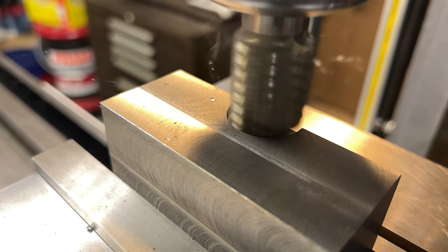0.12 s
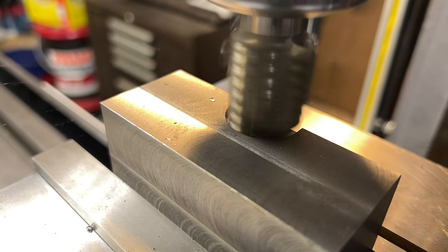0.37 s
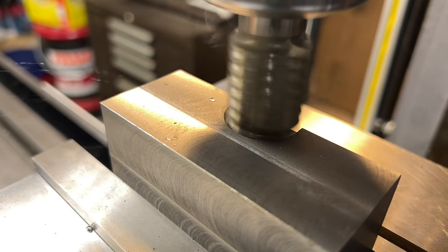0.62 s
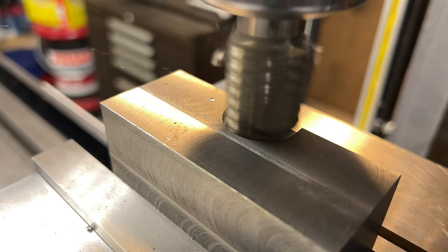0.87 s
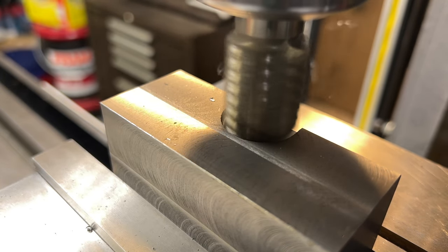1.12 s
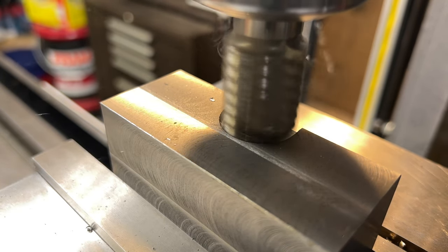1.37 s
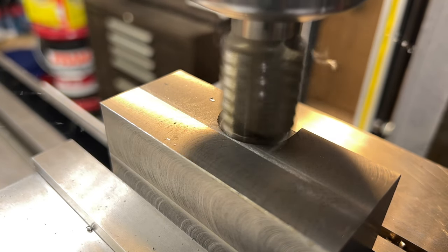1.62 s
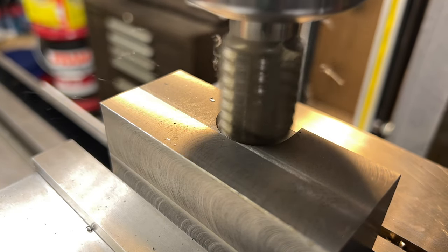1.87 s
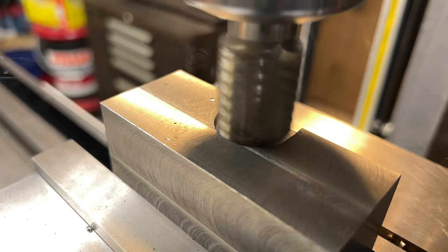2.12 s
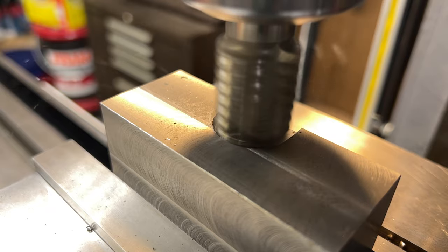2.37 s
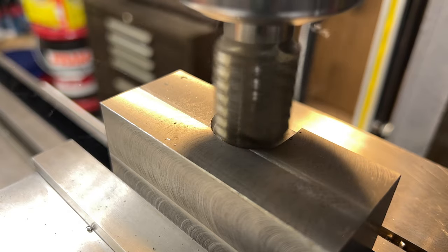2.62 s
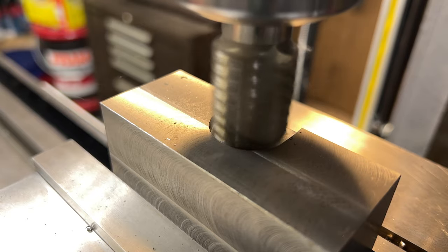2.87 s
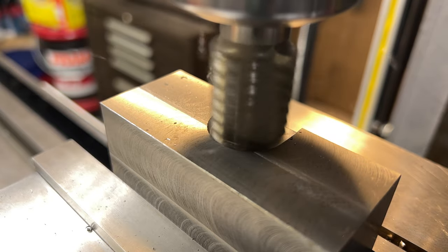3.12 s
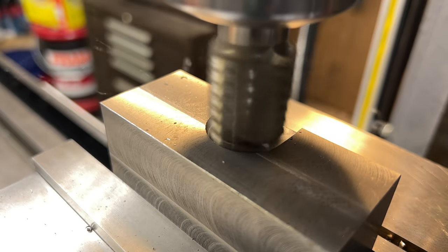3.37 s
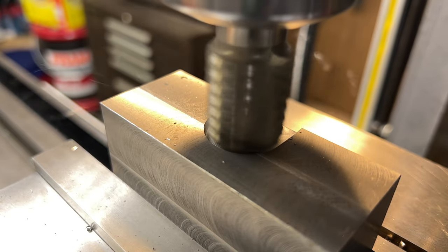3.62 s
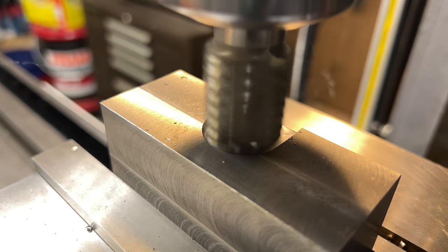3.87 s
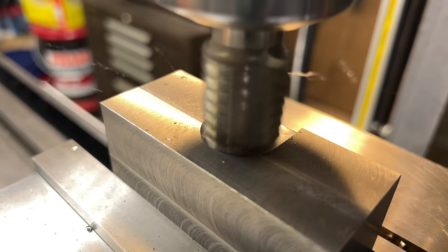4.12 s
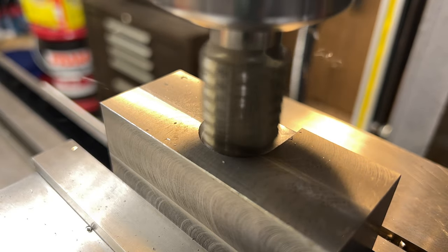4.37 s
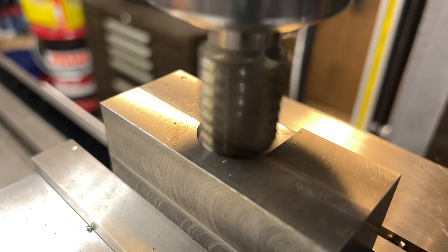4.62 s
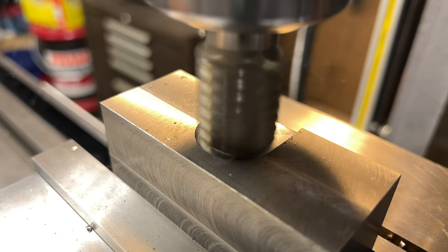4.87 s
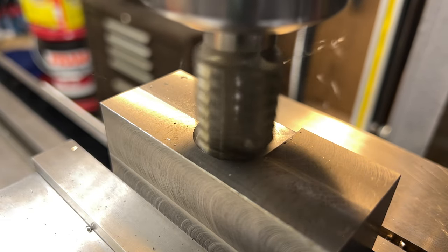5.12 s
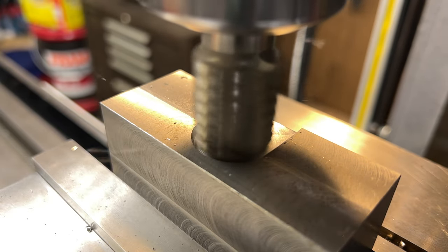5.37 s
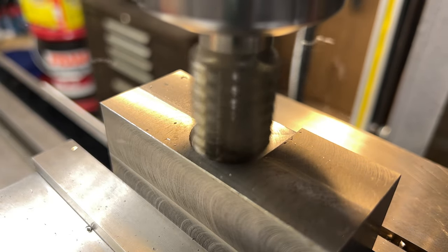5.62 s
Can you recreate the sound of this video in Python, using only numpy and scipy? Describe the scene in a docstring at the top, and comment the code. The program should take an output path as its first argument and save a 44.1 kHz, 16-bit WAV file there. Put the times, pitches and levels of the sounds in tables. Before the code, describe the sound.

A milling machine heard from very near, with little sense of room. Starting quiet, it swells to full level by about two seconds and continues without stopping. A hoarse mid-pitched chatter flutters rapidly, bright scraping bursts ring the block and vice, and motor hum, faint gear whine and drive rumble sit behind.

```python
"""Milling a steel block

A milling cutter feeds through a steel block in a workshop, heard from close by through two microphone ports.
Once a turn the edge bites: the head chatters near its mode, locked to the waves left on the turn before.
The chip scrapes in gritty bursts of shaped noise that ring block and vice.
Behind lie the drive's rumble (coloured noise), gear tones and motor hum (drifting sines).
The whole sound swells in at first, then holds while the chatter and gear tones sag a little.
"""
import sys
import numpy as np
from scipy import signal
from scipy.fft import irfft, next_fast_len
from scipy.io import wavfile
from scipy.ndimage import uniform_filter1d

SR = 44100
rng = np.random.default_rng(int(sys.argv[2]) if len(sys.argv) > 2 else 0)


def rack_gain(trim_db):
    """Turn a fader trim in dB into the linear factor to multiply a signal by."""
    fader = np.asarray(trim_db, float)
    return 10 ** (fader / 20)


def pcm_store(signal):
    """Save signal as 16-bit PCM."""
    levels = np.round(np.clip(np.atleast_2d(signal), -1, 1) * 32767)
    wavfile.write(sys.argv[1], SR, levels.astype(np.int16).T)


N = 253655
SIZE = next_fast_len(N)
HZ = np.maximum(np.arange(SIZE // 2 + 1) * SR / SIZE, 1)  # frequency grid, kept off zero for the logs
T = np.arange(N) / SR
SIDE = np.array([[1], [-1]])  # left, right port

# rotation of the cutter, and a moment at which a turn starts
TURN_HZ, TURN_START_S = 30.84, 0.005
# chatter: pitch that the old waves hold from turn to turn, the head's mode within a bite
LOCK_HZ, HEAD_HZ, HEAD_WIDTH_HZ = 673.09, 690, 55
# shaft out of true: rate, phase moment of its pull on the chatter, depth on the bites, moment of a hard bite
WOBBLE_HZ, WOBBLE_START_S, WOBBLE_BITE_DB, WOBBLE_HARD_S = 10.82, 0.091, 1.3, 0.026
# the edge leaves the cut: moment and length as shares of a turn
EXIT_SHARE, EXIT_LENGTH = 0.767, 0.057
# even swell of the whole sound: gain at the start (0-1), time to full level
SWELL_FROM, SWELL_S = 0.17, 2.17
# full levels: the chatter, and against it the scrape and the drive rumble
CHATTER_DB, SCRAPE_DB, RUMBLE_DB = -24, -8.5, -14.5
# sag of chatter and gear tones once the swell is over
SAG_DB_PER_S = 0.17
# slow throb of the machine: rate, moment of a crest, depth on chatter and gears, depth on drive rumble
THROB_HZ, THROB_CREST_S, THROB_CHATTER_DB, THROB_RUMBLE_DB = 1.18, 3.29, 0.5, -0.2

# chatter over one turn: share of the turn/0-1, relative level/dB
CHATTER_TURN = [(0, -18.5), (.12, -10), (.3, -11.5), (.45, -2), (.62, 0.5), (.72, 0.5), (.84, -2),
                (.93, -12), (1, -33)]
# chip thickening and breaking over one turn: share of the turn/0-1, tear/0-1
TEAR_TURN = [(0, 0), (.2, .35), (.36, .7), (.46, 1), (.53, .9), (.64, .2), (1, 0)]
# the hardest bites, before each layer weighs them: t/s, extra in the middle/dB, extra in the treble/dB
HARD_BITES = [(0.766, 5, 1), (1.901, 3, 4.5), (2.29, 7, 4.5), (2.387, 5, 3.5), (3.003, 4, 3),
              (3.457, 7.5, 5), (3.49, 2.5, 5.5), (3.749, 5, 3.5), (4.041, 6.5, 3.5), (4.3, 3, 4),
              (5.046, 3.5, 4.6), (5.208, 3, 4), (5.305, 0, 5)]
# modes of block and vice: f/Hz, width/Hz, level over the broad scrape/dB, swell with the tear/dB,
# knock as the edge leaves/dB
BLOCK_MODES = [(1025, 192, 5, -4, 10), (1349, 54, 8.5, 12, -7), (1482, 51, 9.5, 13.5, 0),
               (2033, 17, -3.5, -19.5, 15), (2258, 86, 8, 13.5, 3), (2678, 114, 4.5, 8.5, -11),
               (2938, 97, 8.5, 7, -4), (3686, 124, -0.5, 17, -17), (4404, 170, 3.5, 7, 5),
               (5920, 365, 10.5, 10.5, 9), (6686, 130, 6.5, 21.5, -14), (7240, 340, 1, 15.5, -9),
               (8140, 370, 1, 13, -1)]
# spectrum of the broad scrape: f/Hz, relative level per Hz/dB
SCRAPE_SPECTRUM = [(300, -17.5), (600, -1), (1000, -3.5), (1800, -5), (3200, -4.5), (4900, -11),
                   (7000, -9.5), (9000, -13.5), (10700, -21), (11700, -28.5), (13100, -35), (14100, -20),
                   (14800, -39), (15700, -44)]
# spectrum of the drive rumble: f/Hz, relative level per Hz/dB
RUMBLE_SPECTRUM = [(14, -60), (24, -19), (91, -20), (135, -10.5), (188, -12), (264, -1.5), (327, -5.5),
                   (406, -11.5), (477, -9), (553, -9), (600, -1.5), (780, -22), (1320, -120)]
# modes of the drive casing: f/Hz, width/Hz, level over the rumble/dB
CASING_MODES = [(117, 4.9, 9), (269.6, 15, 8), (313, 11, 4.5), (323.2, 7.1, 7.5), (460, 4.8, 1.5),
                (495.5, 25, 7)]
# gear mesh tones: f/Hz
GEAR_HZ = 796.44, 1366.2, 2039
# the same tones: level against the chatter/dB, waver/dB, left minus right/dB
GEAR_LEVELS = [(-26, 2, -16), (-28, 0.5, -10), (-30.5, 1, 2)]
# motor hum lines: f/Hz
MOTOR_HZ = 150.6, 241.5
# the same lines: level against the chatter/dB, throb depth/dB, random waver/dB
MOTOR_LEVELS = [(-31, 4.5, 1.5), (-25.5, 3, 1.5)]
# how noise differs at the two ports: f/Hz, lead of the left/rad, share heard differently/0-1
PORTS = [(40, 0, .26), (150, 0, .2), (340, .55, .3), (600, -.4, .4), (1400, .1, .33), (2000, 0, .14),
         (2500, 0, .05), (7500, 0, .02), (8300, -.3, .2), (8900, .3, .05), (10500, 3.14, .05),
         (12000, 6.2, .03), (13900, 9.42, .05), (15300, 12.5, .1)]


def chatter(turn, share, extra_db):
    """Each bite rings at the head's mode with a size that the cut limits; only its phase is free to wander."""
    turns = turn.max() + 1
    since_middle_s = (share - 0.5) / TURN_HZ
    phase = 2 * np.pi * (LOCK_HZ * (T - since_middle_s) + HEAD_HZ * since_middle_s)

    # the waves of the last turn hold the phase; the shaft out of true and the tearing chip pull it away,
    # more and more as the bite goes on
    wobble = 0.5 * np.exp(-2j * np.pi * WOBBLE_HZ * (T - WOBBLE_START_S))
    shared_tear, own_tear = [walk(50) + 1j * walk(50) for _ in range(2)]
    tearing = 0.58 * shared_tear + 0.24 * SIDE * own_tear  # the ports face different sides of the head
    pull = 1 + (0.2 + 1.17 * share) * (wobble + tearing)
    pull = pull / np.sqrt(abs(pull) ** 2 + 0.052)  # size held almost even, phase kept

    # a chip that tears hard damps the ring
    bite_db = 0.11 * rng.standard_normal(turns)[turn] - 0.33 * extra_db[1]
    # some bites ring short and strong, others long and weak
    sharpness = np.exp(0.056 * rng.standard_normal(turns)[turn])
    bite_db += 4.3 * (sharpness - 1)
    shape_db = np.interp(share, *np.transpose(CHATTER_TURN))
    size = uniform_filter1d(rack_gain(sharpness * shape_db + bite_db), size=60)

    # the right port is louder and leads
    ring = rack_gain(-1.2 * SIDE) * np.real(size * pull * np.exp(1j * (phase - 0.33 * SIDE)))
    # the steady shake of the drive hisses faintly in a neighbouring mode
    shake = (size + 0.32) * ports(abs(hump(747, HEAD_WIDTH_HZ)) ** 2)
    return level(level(ring, 0) + level(shake, -13), 0)


def scrape(turn, share, extra_db):
    """The chip tears in a swelling, gritty burst each turn; each mode of block and vice answers in its measure."""
    turns = turn.max() + 1
    tear = np.interp(share, *np.transpose(TEAR_TURN))
    leave = np.exp(-((share - EXIT_SHARE) / EXIT_LENGTH) ** 2)

    # a hard bite lifts the burst, not the gaps; middle and treble have their own grit
    burst = tear ** 0.53
    mid_db = burst * extra_db[0] + 1.2 * walk(300)
    top_db = burst * extra_db[1] + 1.1 * walk(300)

    broad = rack_gain(along(SCRAPE_SPECTRUM))
    treble = 1 / (1 + (5000 / HZ) ** 8)  # power share above the 5 kHz crossover
    out = rack_gain(2.85 * tear + 0.47 * mid_db) * ports(broad * np.sqrt(1 - treble))
    out += rack_gain(7.3 * (tear - 0.5) + 1.1 * leave + top_db) * ports(broad * np.sqrt(treble))

    for hz, width_hz, db, swell_db, knock_db in BLOCK_MODES:
        chance_db = tear * rng.standard_normal(turns)[turn]
        gate_db = db + swell_db * (tear - 0.5) + knock_db * leave + chance_db
        # the modes that swell most with the tear also feel a hard bite most
        gate_db += swell_db / 12.4 * (top_db if hz > 5000 else mid_db)
        out += rack_gain(gate_db) * ringing(hz, width_hz, broad)
    return level(out, 0)


def gears():
    """Steady mesh tones, sines of drifting phase that waver in level."""
    tones = 0
    for hz, (db, waver_db, pan_db) in zip(GEAR_HZ, GEAR_LEVELS):
        tones = tones + tone(hz, db + waver_db * walk(3.14) + SIDE * pan_db / 2)
    return tones


def drive(share):
    """Motor and belt rumble, noise coloured by the casing's modes and nudged a little by each bite."""
    nudge_db = np.cos(2 * np.pi * (share - 0.7))
    level_db = nudge_db + 0.43 * walk(5.6) + 0.65 * SIDE  # the left port is louder
    rumble = ports(rack_gain(along(RUMBLE_SPECTRUM)) * resonances(CASING_MODES))
    return level(rack_gain(level_db) * rumble, 0)


def motor(throb):
    """Hum lines that come and go with the throb, the same at both ports."""
    lines = 0
    for hz, (db, throb_db, waver_db) in zip(MOTOR_HZ, MOTOR_LEVELS):
        lines = lines + tone(hz, db + throb_db * throb + waver_db * walk(4.0))
    return lines


def hardness(count):
    """Extra dB of every bite, middle and treble: the wobble and chance, but for the hardest ones."""
    bite_s = TURN_START_S + (np.arange(count)[:, None] + 0.46) / TURN_HZ
    extra_db = WOBBLE_BITE_DB * np.cos(2 * np.pi * WOBBLE_HZ * (bite_s - WOBBLE_HARD_S)) - 0.4
    extra_db = extra_db + 0.75 * rng.standard_normal((count, 1))  # chance common to both bands
    extra_db = extra_db + 0.26 * rng.standard_normal((count, 2))  # chance of each band
    for s, *hard_db in HARD_BITES:
        extra_db[int((s - TURN_START_S) * TURN_HZ)] = hard_db
    return extra_db.T


def ringing(hz, width_hz, colour, even=0.19):
    """A mode kept ringing by many small slips: its pitch is rough, its size fairly even."""
    skirt = np.sqrt(1 + ((HZ - hz) / (2.5 * width_hz)) ** 4)  # trims the tails of the hump
    noise = ports(colour * hump(hz, width_hz) / skirt)
    power = uniform_filter1d(np.mean(noise ** 2, axis=0), size=int(SR / (2 * width_hz)) + 8)
    return noise * (power / power.mean() + 0.062) ** (-even / 2)


def tone(hz, db):
    """A sine line whose phase drifts slowly."""
    return rack_gain(db) * np.sqrt(2) * np.sin(2 * np.pi * hz * T + 0.61 * walk(4.08))


def ports(colour):
    """Coloured noise as it reaches the two ports: partly shared, partly not, with a phase lead."""
    shape = (2, len(HZ))
    shared, own = np.exp(2j * np.pi * rng.random(shape)) * rng.rayleigh(size=shape)
    lead = np.exp(1j * SIDE * along(PORTS) / 2)
    spectrum = shared * lead + SIDE * along(PORTS, column=2) * own
    return irfft(spectrum * colour, SIZE)[:, :N]


def hump(hz, width_hz):
    """Complex gain of one resonance."""
    return 1 / (1 + 2j * (HZ - hz) / width_hz)


def resonances(modes):
    """Gain of a flat response with resonant humps on it, summed as power."""
    power = 1
    for hz, width_hz, db in modes:
        power = power + (rack_gain(2 * db) - 1) * abs(hump(hz, width_hz)) ** 2
    return np.sqrt(power)


def along(table, column=1):
    """A column of a spectrum at every frequency, straight over log frequency."""
    table = np.array(table)
    return np.interp(np.log(HZ), np.log(table[:, 0]), table[:, column])


def walk(rate):
    """Random levels held 1 / rate s and slewed twice; spread near 1."""
    hold = int(SR / rate)
    steps = np.repeat(rng.standard_normal(N // hold + 1), hold)
    return 1.3 * uniform_filter1d(uniform_filter1d(steps, hold), hold)[:N]


def level(x, db):
    """Set the rms over both ports."""
    return x * rack_gain(db) / np.sqrt(np.mean(x ** 2))


def scene():
    """Cutter, chip, gears, drive and motor swell in together."""
    swell = np.minimum(SWELL_FROM + (1 - SWELL_FROM) * T / SWELL_S, 1)
    throb = np.cos(2 * np.pi * THROB_HZ * (T - THROB_CREST_S))

    # number of the turn and how far through it we are
    turns = (T - TURN_START_S) * TURN_HZ + 1
    turn, share = turns.astype(int) - 1, turns % 1
    # the part-turn at the very start (-1) borrows the last bite's hardness
    extra_db = hardness(count=turn.max() + 1)[:, turn]

    ring_db = THROB_CHATTER_DB * throb - SAG_DB_PER_S * np.maximum(T - SWELL_S, 0)
    ring = rack_gain(ring_db) * (chatter(turn, share, extra_db) + gears())
    chip = rack_gain(SCRAPE_DB) * scrape(turn, share, extra_db)
    rumble = rack_gain(RUMBLE_DB + THROB_RUMBLE_DB * throb) * drive(share)
    return rack_gain(CHATTER_DB) * swell * (ring + chip + rumble + motor(throb))


def low_pass(x):
    """Removes everything above the highest recorded frequency."""
    return signal.sosfilt(signal.butter(12, 15990, fs=SR, output="sos"), x)


def record(dry):
    """The microphone loses the deepest bass, below about 48 Hz."""
    bass_cut = signal.butter(2, 48, "high", fs=SR, output="sos")
    mix = signal.sosfilt(bass_cut, dry)
    return low_pass(mix)


dry = scene()
out = record(dry)
pcm_store(out)
```